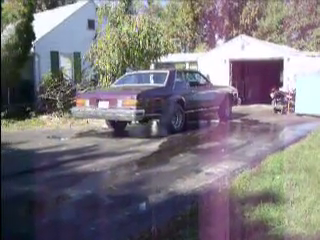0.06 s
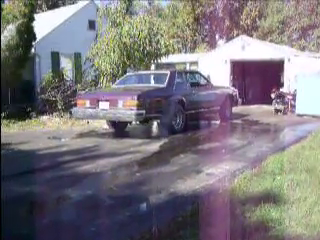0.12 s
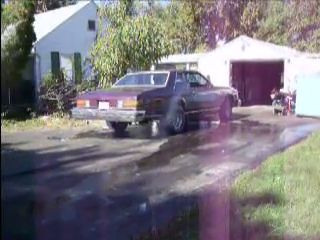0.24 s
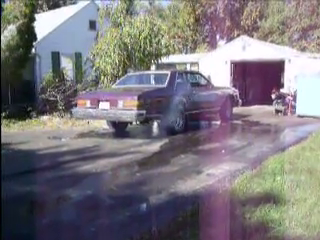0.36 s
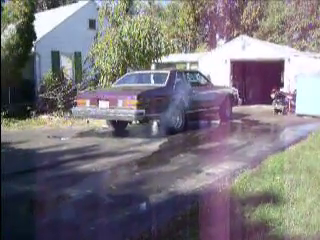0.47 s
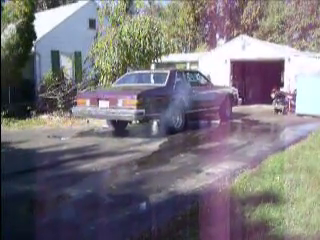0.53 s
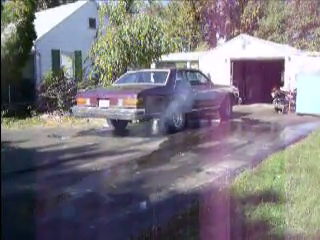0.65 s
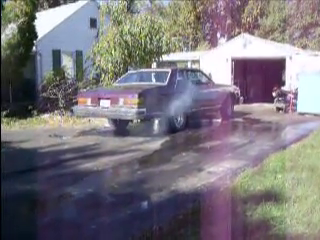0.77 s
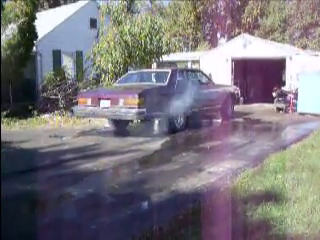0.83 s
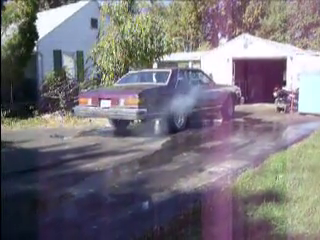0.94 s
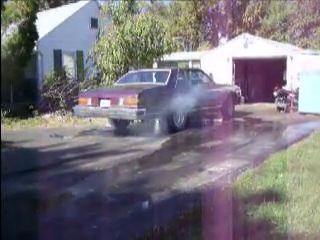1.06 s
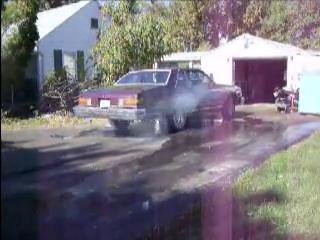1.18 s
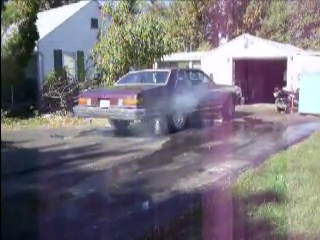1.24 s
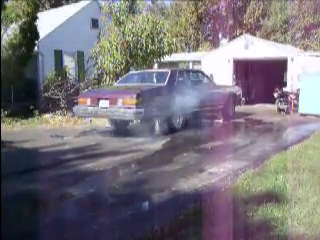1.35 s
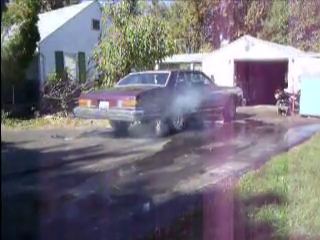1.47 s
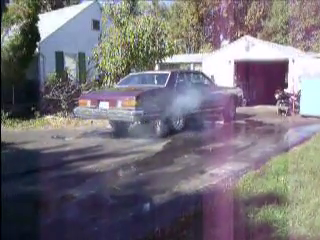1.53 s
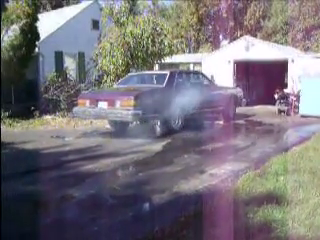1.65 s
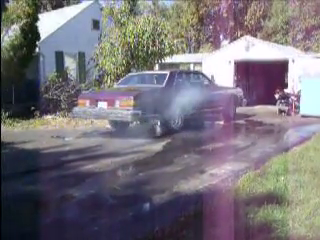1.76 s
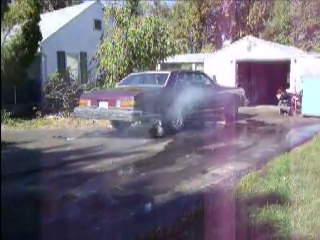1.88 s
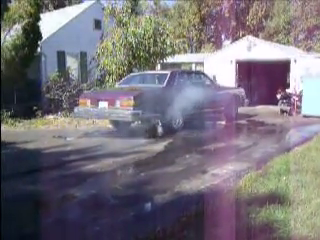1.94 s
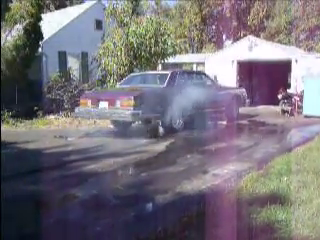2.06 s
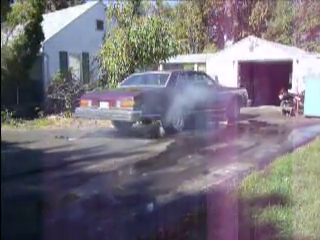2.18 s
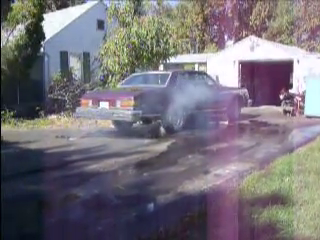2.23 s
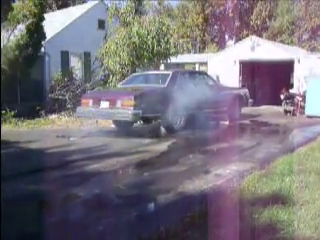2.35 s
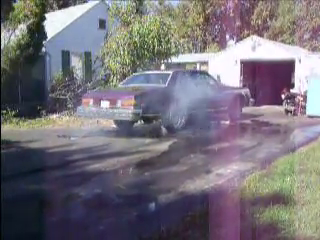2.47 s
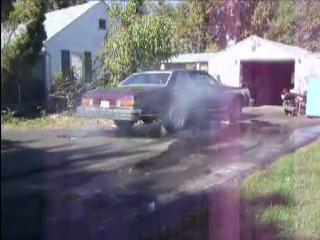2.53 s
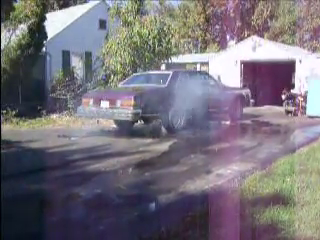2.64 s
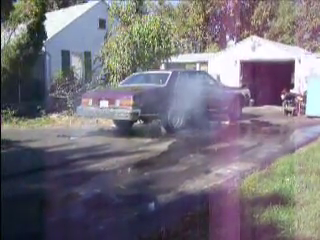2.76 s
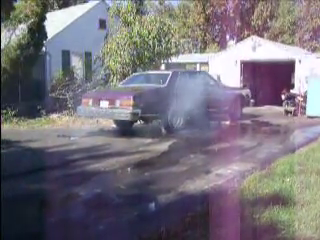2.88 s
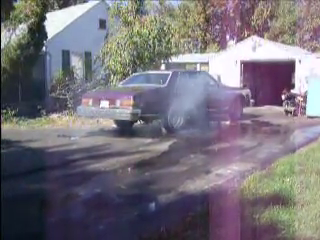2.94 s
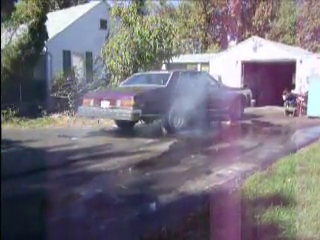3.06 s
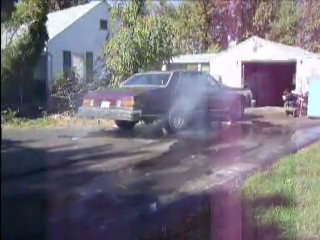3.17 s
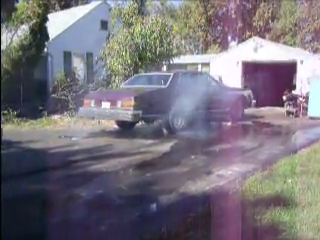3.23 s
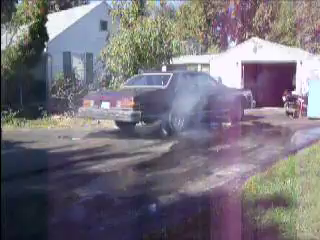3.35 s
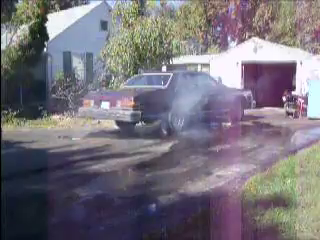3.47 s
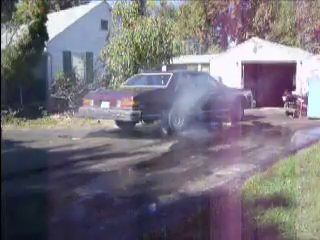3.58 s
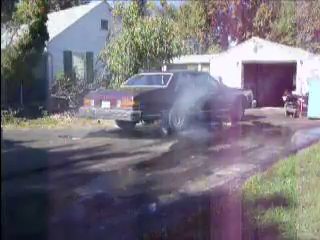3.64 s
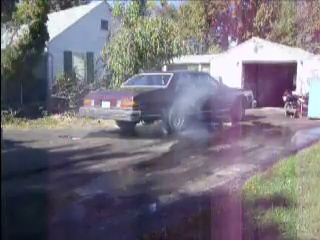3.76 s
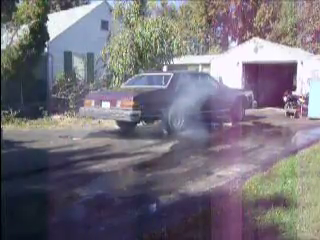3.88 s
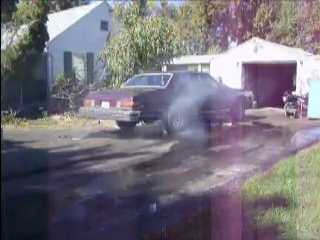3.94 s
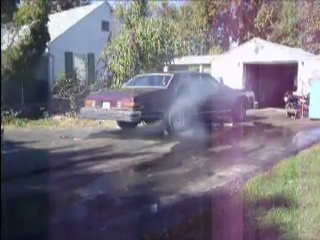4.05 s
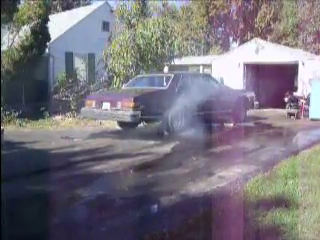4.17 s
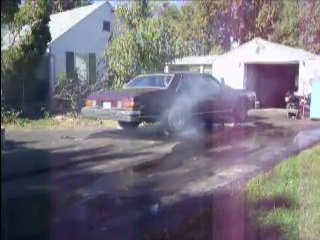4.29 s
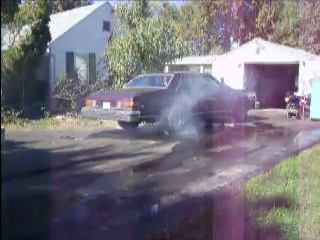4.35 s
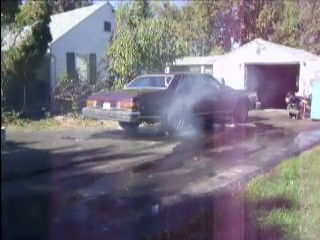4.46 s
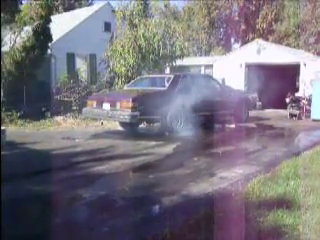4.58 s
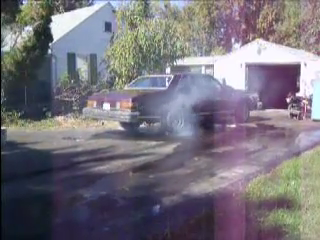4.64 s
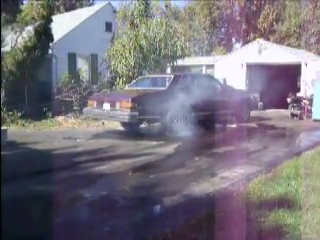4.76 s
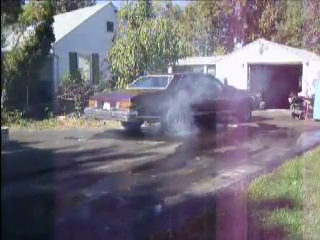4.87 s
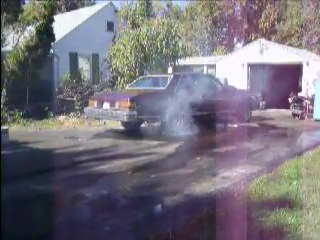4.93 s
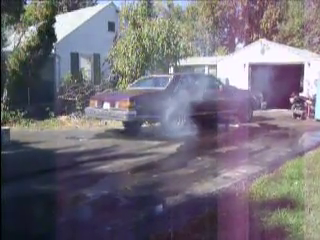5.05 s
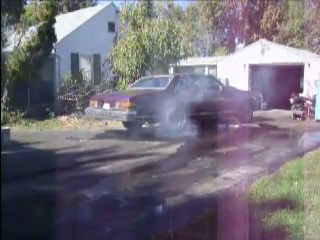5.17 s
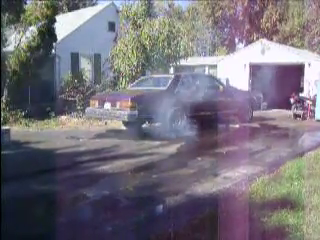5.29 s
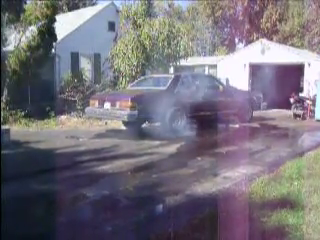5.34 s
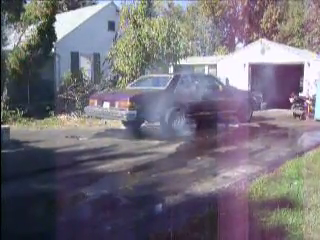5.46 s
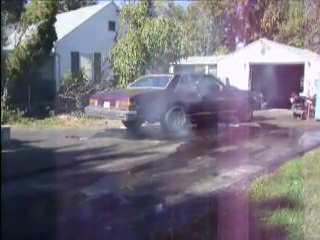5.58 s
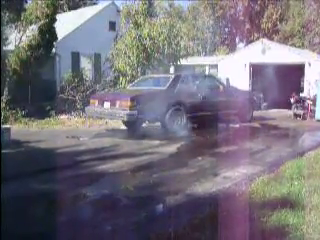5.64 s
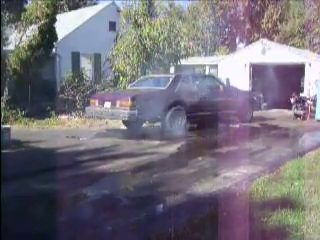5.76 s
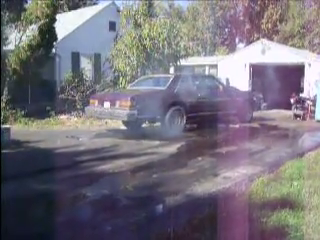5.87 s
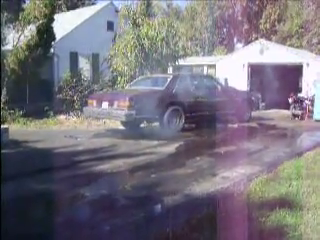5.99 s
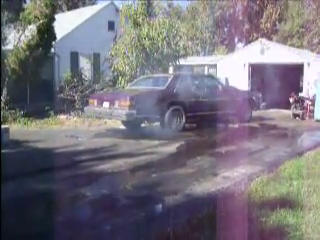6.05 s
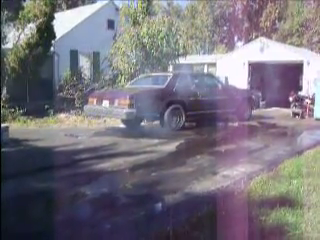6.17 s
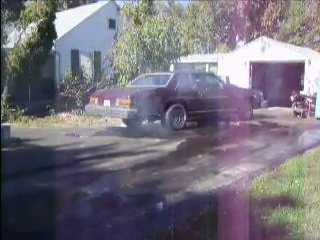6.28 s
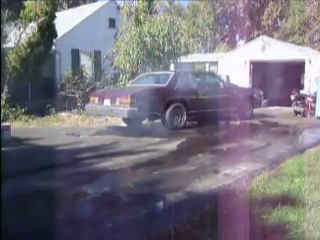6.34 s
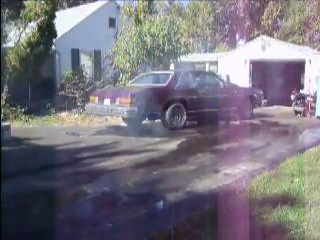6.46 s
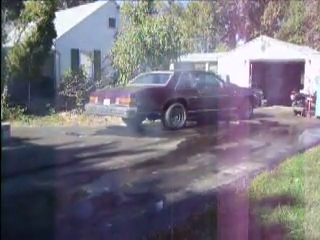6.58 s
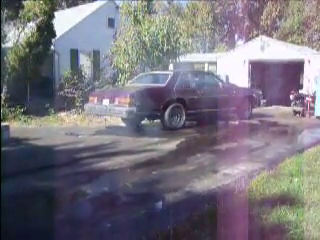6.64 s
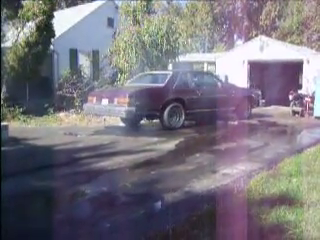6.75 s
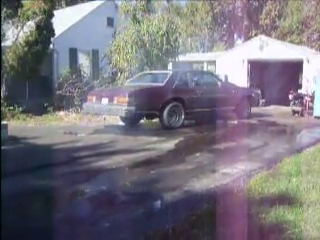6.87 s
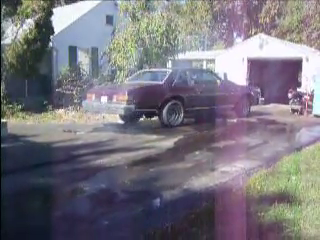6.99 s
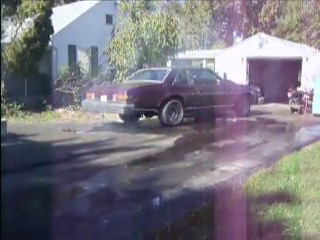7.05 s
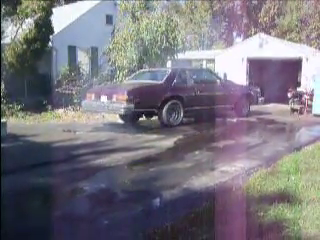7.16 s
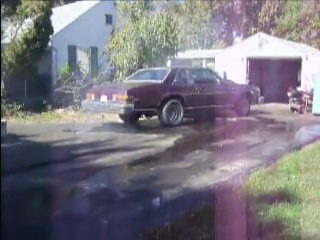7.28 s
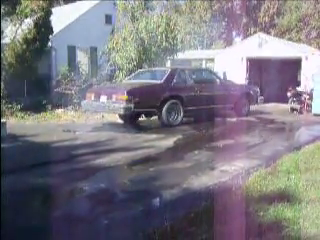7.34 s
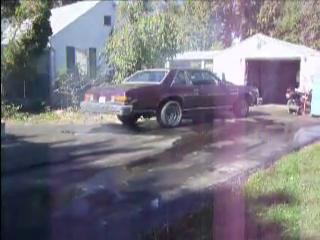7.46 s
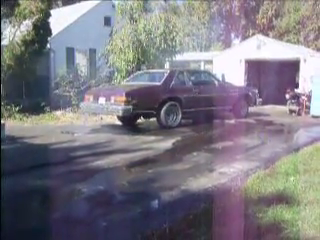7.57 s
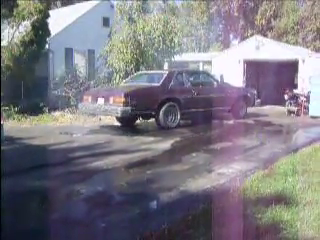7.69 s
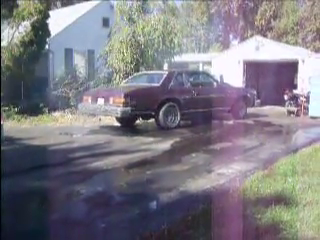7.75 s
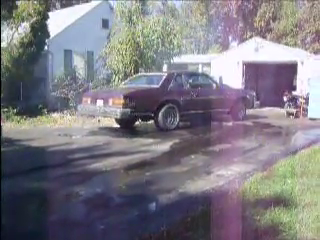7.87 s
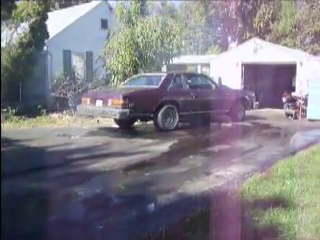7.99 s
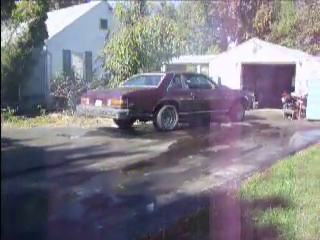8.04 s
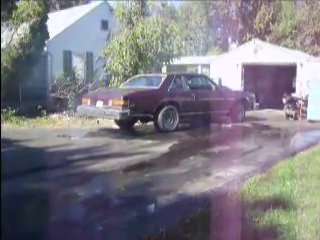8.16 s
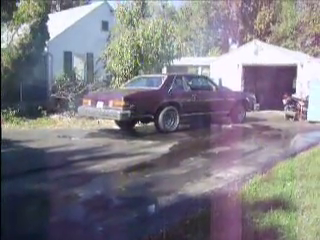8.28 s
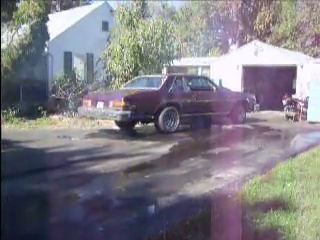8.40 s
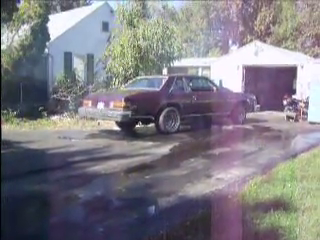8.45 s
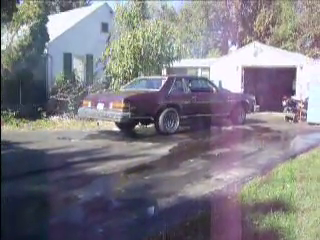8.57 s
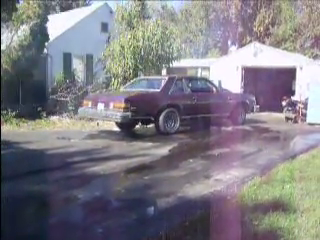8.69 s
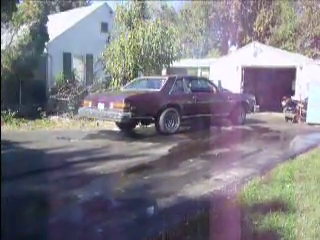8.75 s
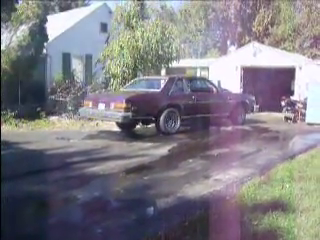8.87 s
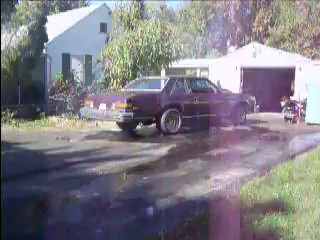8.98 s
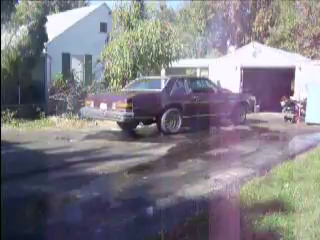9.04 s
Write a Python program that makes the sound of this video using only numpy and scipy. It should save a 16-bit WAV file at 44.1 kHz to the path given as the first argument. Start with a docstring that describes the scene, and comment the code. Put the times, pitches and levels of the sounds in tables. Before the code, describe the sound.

A big car engine is already racing at high revs, close by on a wet driveway, with the hiss of a spinning tyre. From about 0.7 to 1.6 seconds its pitch is dragged down by roughly an octave, and it then labours in a steady roar with faint exhaust ticking. The tyre chirps sharply between 1.4 and 1.8 seconds and squeals raggedly on, fading around 3.5 seconds and returning in brief chirps until nearly 5. At about 5 seconds the throttle closes, the tyre noise dies and the revs tumble to a deep, lumpy idle. From 5.3 seconds a leaking exhaust spits and pops in quick, uneven runs over the low throb. The revs lift slightly at 6.4 seconds and again from 8.5 until the end, around 9. Nearby walls give a short echo, and the loudest beats slightly overload the microphone.

```python
"""A wet driveway between house and garage, one microphone close to a V8 car spinning a rear tyre.
The engine races, is dragged down as the tyre bites and squeals, labours for three seconds, then drops
to a lumpy idle. Cylinder pulses boom in the pipe and bark at its mouth; one bank spits through a leak
in the exhaust. The walls answer, and the loudest exhaust beats overload the microphone."""
import sys
import numpy as np
from scipy import signal
from scipy.fft import rfft, irfft
from scipy.io import wavfile
from scipy.ndimage import uniform_filter1d, map_coordinates

SR = 44100
rng = np.random.default_rng(int(sys.argv[2]) if len(sys.argv) > 2 else 0)


def master_out(mix):
    """Clip the mix to full scale and print it as 16-bit PCM to the path in sys.argv[1]."""
    frames = np.transpose(np.atleast_2d(mix))
    ceiling = np.clip(frames, -1, 1)
    pcm = np.round(ceiling * 32767).astype(np.int16)
    wavfile.write(sys.argv[1], SR, pcm)


N = 402191
TIME = np.arange(N) / SR
LIFT_S, SHUT_S = 4.734, 4.98  # the foot starts to lift; the throttle is half shut

# Engine speed. Each row: time in seconds, firings per second.
FIRING_RATE = [(0, 273.8), (.45, 270), (.72, 263.5), (.9, 239), (1.1, 198.8), (1.4, 154.5), (1.6, 139.8),
               (2.3, 139.1), (2.8, 140.8), (4.2, 138.3), (4.75, 133.5), (4.9, 124), (5.1, 72), (5.35, 43),
               (6.05, 41), (6.4, 55), (7.3, 54), (8.25, 46), (8.5, 55), (8.56, 79), (9.12, 84)]
# The eight cylinders in firing order. Each row: pulse in dB, lag down the pipe in ms, leak in dB.
CYLINDERS = [(-1.1, 0, 2), (5.5, 4, -1), (-0.5, 3, -18.5), (0.5, 2, -7), (1.6, 1.5, 1), (5.5, 1.22, -29.5),
             (7, 2.5, -22), (-4, 3, 6)]
# Runs of spits at idle. Each row: start in seconds, number of spits, first jet in dB, first pop in dB.
SPIT_RUNS = [(5.345, 2, -28.5, -39.5), (5.505, 2, -17.5, -32), (5.609, 1, -18.5, -33.5),
             (5.654, 2, -17, -34.5), (5.746, 1, -14.5, -29.5), (5.793, 1, -13.5, -24.5),
             (5.838, 2, -12.5, -31), (5.927, 1, -12.5, -38), (6.03, 2, -20, -34.5), (6.13, 2, -9, -24),
             (6.258, 1, -11.5, -24.5), (6.338, 2, -14.5, -30.5), (6.446, 4, -10, -26.5),
             (6.589, 1, -10.5, -34), (6.664, 2, -17.5, -36.5), (6.735, 2, -10.5, -29), (6.843, 1, -15, -27),
             (6.918, 2, -20, -35), (7.028, 4, -12, -27.5), (7.175, 1, -12, -34.5), (7.252, 1, -16, -33.5),
             (7.32, 2, -11.5, -24), (7.431, 1, -14, -27), (7.506, 2, -16.5, -33), (7.625, 4, -13.5, -27),
             (7.786, 1, -14.5, -44), (7.876, 1, -18.5, -35.5), (7.966, 2, -10.5, -25), (8.089, 3, -14, -30),
             (8.211, 2, -24, -40), (8.299, 4, -10.5, -27.5), (8.458, 3, -14.5, -31),
             (8.557, 1, -14.5, -28.5), (8.584, 4, -11.5, -27), (8.708, 1, -16, -31), (8.779, 2, -13.5, -30),
             (8.847, 2, -18, -31.5), (8.966, 2, -12.5, -30.5), (9.015, 3, -10.5, -28),
             (9.088, 1, -9, -24.5)]
# Spectra of rushing gas. Each row: frequency in Hz, gain in dB.
PIPE_RASP = [(140, -21.5), (230, -8.5), (315, -3), (440, -9.5), (560, -8), (650, -10.5), (740, 2),
             (830, -3.5), (900, -6), (1010, -5.5), (1230, -20), (1550, -8.5), (1820, -22), (2130, -12),
             (2600, -16.5), (3400, -22.5), (5700, -103)]
LEAK_JET = [(1060, -58), (1800, -15), (2130, -1), (2610, -11.5), (2780, -2.5), (3570, 0.5), (3880, -3.5),
            (4780, 0.5), (5660, 3.5), (6600, -5.5), (8900, 2.5), (11000, -3.5), (11700, -15), (12400, -60),
            (16100, -81), (22000, -120)]
LEAK_SIZZLE = [(3000, -29.5), (5400, -7.5), (6700, -8.5), (8600, -5), (10000, -12), (12300, -44)]


def exhaust(turn, times, cylinder, jitter_ms=0.082, boom_fall_db_per_s=20.5, mouth_fall_db_per_s=66):
    """Uneven cylinder pulses boom in the pipe and bark at its mouth, each with a puff of turbulence."""
    # Rumble inside the pipe and bark at its mouth. Each row: frequency in Hz, gain in dB.
    rumble_spectrum = [(30, -21), (90, 2), (200, -0.5), (290, -3), (380, -1.5), (480, -16), (620, -36)]
    bark_spectrum = [(400, -47), (520, -28), (620, 1), (760, -3), (900, -2.5), (1000, -3.5), (1200, -31),
                     (1550, -30), (1850, -31), (2100, -32), (2700, -26), (5000, -57)]
    size_db, lag_ms, _ = np.array(CYLINDERS)[cylinder].T
    timing, strength, gust = rng.standard_normal((len(times), 3)).T
    arrivals = times + (lag_ms + jitter_ms * timing) / 1000
    beats = pulses(arrivals, amp(size_db + 2.5 * strength))
    flow = steady(puffs(times, amp(3.5 * gust), rise_s=.002))
    racing = np.clip((curves(FIRING_RATE)[0] - 148) / 118, 0, 1)
    strain = np.sin(np.pi * racing)  # combustion is roughest while the engine is dragged down
    boom = pipe_tones(turn, racing, strain) + turbulence(flow * amp(-20 + 12 * strain), rumble_spectrum)
    bark = amp(-4 - 12 * racing) * steady(colour(beats, bark_spectrum))
    rasp = turbulence(flow * amp(-5 - 4 * racing), PIPE_RASP)
    lifted_s = np.maximum(TIME - LIFT_S, 0)
    boom_db = -14 - boom_fall_db_per_s * lifted_s
    mouth_db = -26 + 8.5 * racing + 1.5 * strain - mouth_fall_db_per_s * lifted_s
    return (1 - throttle_shut()) * amp(boom_db) * boom + amp(mouth_db) * (bark + rasp)


def pipe_tones(turn, racing, strain, waver_db=.9, burble_db=7):
    """Harmonics of the engine cycle; the pattern of strong and weak cylinders lines them up into beats."""
    # Each row: multiple of the eight-cylinder cycle, level racing free in dB, level labouring in dB.
    harmonics = [(3, -22, -28), (4, -21, -32), (5, -4, -10), (6, -13, -13), (7, -19, -8), (8, -2, 0),
                 (9, -9, -9), (10, -25, -17), (11, -14, -8), (12, -12, -19), (13, -15, -16), (14, -31, -15),
                 (15, -33, -24), (16, -21, -28), (17, -27, -26), (18, -14, -32), (19, -16, -25),
                 (20, -12, -31), (21, -11, -26), (22, -14, -28), (23, -19, -31), (24, -23, -26),
                 (26, -14, -40), (28, -19, -36), (36, -38, -22), (39, -38, -28), (43, -36, -25),
                 (46, -36, -26)]
    # The muffler swallows tones that slide through its dead band. Each row: frequency in Hz, gain in dB.
    muffler = [(440, 0), (475, -14), (520, -14), (545, -3), (600, 0)]
    pattern = np.angle(np.fft.fft(amp(np.transpose(CYLINDERS)[0])))
    cycle = 2 * np.pi * turn / len(CYLINDERS)
    tones = np.zeros(N)
    for multiple, racing_db, labouring_db in harmonics:
        k = round(multiple)
        level = racing * racing_db + (1 - racing) * labouring_db + waver_db * wobble(13)
        # under strain the two banks beat against each other, lifting multiples 5, 13 and 21
        level += burble_db * strain * (k % len(CYLINDERS) == 5)
        dispersion = np.pi / 3 * (k - len(CYLINDERS)) ** 2  # the long pipe smears the beats
        drift = (.08 + .009 * k) * wobble(18)
        tones += amp(level) * np.cos(k * cycle + pattern[k % len(pattern)] + dispersion + drift)
    return steady(colour(tones, muffler))


def idle(times, cylinder, scatter_db=7.5, jitter_s=0.00081, bank_db=3, blip_ratio=1.194):
    """Slow, ragged firings ring the pipe's lowest resonance, which wanders and rises with the revs."""
    # The idle's lope. Each row: time in seconds, level in dB.
    lope = [(5, -21.5), (5.17, -28.5), (5.5, -29.5), (5.67, -22), (5.93, -26), (6.2, -22.5), (7.5, -23.5),
            (7.8, -19), (7.89, -30), (8, -20.5), (8.28, -23), (8.4, -20.5), (9.12, -20)]
    # The pipe's boom. Each row: frequency in Hz, gain in dB.
    resonance = [(15, -37), (30, -6), (55, -12.5), (76, -3), (97, 6.5), (115, -1.5), (145, -15.5),
                 (200, -21), (300, -31.5), (450, -61), (3000, -110)]
    strength, timing = rng.standard_normal((len(times), 2)).T
    size_db = 0.19 * np.array(CYLINDERS)[cylinder, 0] - bank_db * (cylinder % 2) + scatter_db * strength
    beats = pulses(times + jitter_s * timing, amp(size_db))
    blip = np.clip((curves(FIRING_RATE)[0] - 55) / 28 + 0.35 * wobble(7), 0, 1)  # a touch of throttle
    low = colour(beats, resonance)
    high = colour(beats, np.array(resonance) * [blip_ratio, 1])
    boom = steady((1 - blip) * low + blip * high, size=2400)
    return throttle_shut() * amp(curves(lope)[0]) * boom


def firings():
    """Running count of firings; at idle the crank stumbles so each run of spits starts on an even one."""
    turn = np.cumsum(curves(FIRING_RATE)[0]) / SR
    run_s = np.transpose(SPIT_RUNS)[0]
    stumble = np.unwrap(np.interp(run_s, TIME, turn) % 2, period=2)
    return turn - np.interp(TIME, np.r_[run_s[0] - .5, run_s], np.r_[0, stumble])


def throttle_shut(closing_s=0.1):
    """0 while the throttle is open, 1 once it has closed."""
    return np.clip((TIME - SHUT_S) / closing_s + .5, 0, 1)


def leak_ticks(times, cylinder, scatter_db=3.5, sizzle_share=0.33):
    """Under load, gas escaping through the leak ticks with a few of the cylinders."""
    # Each row: time in seconds, level of the ticking in dB.
    loudness = [(0, -37.5), (1.8, -38), (2.2, -32), (2.9, -31.5), (3.3, -40.5), (4.2, -31), (4.8, -28.5),
                (4.92, -35), (5.02, -70)]
    sizes = amp(np.array(CYLINDERS)[cylinder, 2] + scatter_db * rng.uniform(-0.63, 1, len(times)))
    gas = (1 - sizzle_share) * noise(LEAK_JET) + sizzle_share * noise(LEAK_SIZZLE)
    return amp(curves(loudness)[0]) * steady(puffs(times, sizes, rise_s=0.0017) * gas, size=12000)


def leak_spits(turn, lead_s=0.0052, sizzle_growth=1.63):
    """At idle the leak spits jets of gas that pop in the pipe; the hardest ones sizzle at their peak."""
    # The dry crack that some spits carry. Each row: frequency in Hz, gain in dB.
    crack_spectrum = [(1200, -42), (2300, -12), (3000, -6), (4400, 1), (6000, -2.5), (9000, -25)]
    times, jet_db, pop_db = spit_beats(turn)
    onsets = times - lead_s
    jet_flow = puffs(onsets, amp(jet_db - 13), rise_s=0.0077) * amp(1.6 * wobble(500))
    jet = turbulence(jet_flow, LEAK_JET)
    sizzle = turbulence(puffs(times, amp(sizzle_growth * jet_db - 2), rise_s=0.0029), LEAK_SIZZLE)
    ring = pipe_ring(times, pop_db - 1)
    crack_sizes = amp(jet_db - 15) * rng.uniform(0, 1, len(times)) ** 2
    crack = turbulence(puffs(onsets, crack_sizes, rise_s=0.014), crack_spectrum)
    clinks = steel_clinks(times, jet_db - 12)
    pop = turbulence(puffs(onsets, amp(pop_db - 0.5), rise_s=0.01), PIPE_RASP)
    return jet + crack + sizzle + clinks + ring + pop


def spit_beats(turn, fade_db=0.9, offbeat_db=2.5):
    """Time, jet dB and pop dB of each spit: a fading run follows the leaking bank, strong then weak."""
    beats = []
    for start, count, jet_db, pop_db in SPIT_RUNS:
        for k in range(round(count)):
            loss = fade_db * k + offbeat_db * (k % 2)
            beats.append((np.interp(start, TIME, turn) + 2 * k, jet_db - loss, pop_db - loss))
    firing, jet, pop = np.transpose(beats)
    return np.interp(firing, turn, TIME), jet, pop


def pipe_ring(times, db, centre_hz=810, spread=0.1726, t60=0.11, attack_s=0.013):
    """Each pop leaves three hollow tones ringing, never quite the same ones."""
    detune = np.clip(rng.standard_normal((len(times), 3, 1)), -2, 1.5)
    return ringing(times, db, centre_hz * np.exp(spread * detune), t60, attack_s, size=SR // 5)


def steel_clinks(times, db, low_hz=2000, high_hz=6000, t60=0.043, attack_s=0.0056):
    """Each spit rings the thin steel around the leak at three pitches of its own."""
    pitches = low_hz * (high_hz / low_hz) ** rng.uniform(0, 1, (len(times), 3, 1))
    return ringing(times, db, pitches, t60, attack_s, size=SR // 10)


def tyre_hiss():
    """The spinning tyre hisses on wet asphalt."""
    # Each row: time in seconds, level of the hiss in dB.
    loudness = [(0, -31.5), (.8, -29.5), (1.1, -35.5), (1.5, -30), (4.8, -32), (4.95, -46), (5.25, -73)]
    # Each row: frequency in Hz, gain in dB.
    spectrum = [(680, -27), (1150, -14), (1280, -7.5), (1570, -2), (1820, -10), (2130, 3.5), (2570, -13.5),
                (2870, -5), (4320, -4), (4670, -2.5), (6490, -7), (9380, -4.5), (11000, -9.5), (11700, -29),
                (12400, -59), (22000, -120)]
    return amp(curves(loudness)[0] + 1.2 * wobble(40)) * noise(spectrum)


def tyre_squeal(wander=0.03, roughness=0.031, flutter_db=4, patchy_db=3, ribs=2):
    """Once the tyre has rubbed its patch dry, its tread ribs squeal raggedly."""
    # The rubber's harmonics. Each row: multiple of the pitch, relative level in dB.
    harmonics = [(1, -7.5), (2, 0), (3, -8.5)]
    pitch, level = squeal_path()
    fundamental_db = 9 * np.clip((1700 - pitch) / 130, 0, 1)  # low chirps favour their fundamental
    squeal = np.zeros(N)
    for _ in range(ribs):
        ragged_hz = pitch * (1 + wander * wobble(45) + roughness * wobble(900))
        phase = 2 * np.pi * np.cumsum(ragged_hz) / SR
        rib = sum(amp(db + fundamental_db * (k == 1) + flutter_db * wobble(250)) * np.sin(k * phase)
                  for k, db in harmonics)
        squeal += amp(patchy_db * wobble(30.11)) * rib
    return amp(level - 2) * unit(squeal)


def squeal_path(half_chirp_s=.036):
    """Pitch and dB of the squeal: the tread grabs, swoops into a chirp and lets go."""
    # The held squeal and its chirps. Each row: time in seconds, pitch in Hz, relative level in dB.
    sustained = [(1.39, 2123, -64), (1.43, 2125, -30.5), (2.45, 1929, -30), (2.88, 1943, -32.5),
                 (3.35, 1720, -38), (3.7, 1563, -57), (4.45, 1823, -43), (4.58, 1952, -35),
                 (4.92, 1854, -33.5), (5.12, 1800, -90)]
    chirps = [(1.435, 2116, -21.5), (1.515, 1872, -20.5), (1.65, 1954, -27.5), (1.725, 1994, -19.5),
              (1.82, 2156, -30), (2.399, 1916, -24), (2.59, 1807, -29), (3.78, 1563, -30),
              (4.69, 1567, -32), (4.76, 2083, -35)]
    pitch, level = curves(sustained)
    for peak_s, hz, db in chirps:
        grab = np.exp(-((TIME - peak_s) / half_chirp_s) ** 2)
        pitch = pitch + grab * (hz - pitch)
        level = level + grab * (db - level)
    return pitch, level


def walls(x, t60=0.27, build_s=0.007):
    """Scattered answer of house, garage and trees, with little bass."""
    t = TIME[:SR // 2]
    tail = rng.standard_normal(len(t)) * amp(-60 * t / t60) * (1 - np.exp(-t / build_s))
    wet = signal.fftconvolve(x, tail / np.linalg.norm(tail))[:N]
    return colour(wet, [(150, -6), (600, 4.5), (4000, 1), (10000, -4)])


def outdoor_air():
    """The steady, low background around the driveway."""
    # Each row: frequency in Hz, gain in dB.
    spectrum = [(20, -2), (150, 2), (400, -14), (900, -10.5), (1300, -19), (4000, -20.5), (10000, -26.5),
                (12500, -70)]
    return noise(spectrum)


def amp(db):
    """Decibels to gain."""
    return 10 ** (np.asarray(db) / 20)


def unit(x):
    """x at rms 1."""
    return x / np.sqrt(np.mean(x ** 2) + 1e-20)


def steady(x, size=6000):
    """x at a running rms of 1, over about size samples."""
    power = uniform_filter1d(uniform_filter1d(x ** 2, size), size // 2)
    return x / np.sqrt(np.abs(power) + 1e-14)


def curves(rows):
    """One value per sample for each column after the time."""
    seconds, *columns = np.transpose(rows)
    return [np.interp(TIME, seconds, column) for column in columns]


def wobble(rate):
    """A smooth random curve, rate knots a second."""
    knots = rng.standard_normal(int(N * rate / SR) + 4)
    fine = np.arange(0, len(knots), 1 / 8)
    return np.interp(TIME * rate, fine, map_coordinates(knots, [fine]))


def colour(x, spectrum, size=16384):
    """x through a causal filter with the (Hz, dB) spectrum as its gain."""
    hz, db = np.transpose(spectrum)
    gain = amp(np.interp(np.log(np.fft.rfftfreq(size, 1 / SR) + 1), np.log(hz), db))
    cepstrum = irfft(np.log(gain + 1e-6))
    cepstrum[1:size // 2] *= 2  # folded for minimum phase
    cepstrum[size // 2 + 1:] = 0
    response = irfft(np.exp(rfft(cepstrum)))[:size // 2]
    return signal.fftconvolve(x, response)[:N]


def noise(spectrum):
    """Coloured noise of rms 1."""
    return unit(colour(rng.standard_normal(N), spectrum))


def turbulence(flow, spectrum):
    """Noise that follows a gas flow, then rings in the spectrum; a flow of 1 gives rms 1."""
    white = rng.standard_normal(N)
    return colour(flow * white, spectrum) / np.std(colour(white, spectrum))


def pulses(times, sizes):
    """One impulse at each time."""
    return np.bincount(np.clip(np.round(times * SR), 0, N).astype(int), sizes, N + 1)[:N]


def puffs(times, sizes, rise_s):
    """Gas flow that swells after each time and dies away."""
    u = TIME[:SR // 8] / rise_s
    return signal.fftconvolve(pulses(times, sizes), (u * np.exp(1 - u)) ** 2)[:N]


def ringing(times, db, pitches, t60, attack_s, size):
    """A cluster of decaying sines, size samples long, at each time."""
    t = TIME[:size]
    fade = amp(-60 * t / t60) * (1 - np.exp(-t / attack_s))
    out = np.zeros(N + SR)
    for start, level, hz in zip(times, db, pitches):
        out[int(start * SR):][:size] += amp(level) * fade * np.sin(2 * np.pi * hz * t).sum(0)
    return out[:N]


def scene():
    """The car close by, the walls and the open air behind it, in mono."""
    turn = firings()
    number = np.arange(int(turn[-1]))
    times = np.interp(number, turn, TIME)
    cylinder = number % len(CYLINDERS)
    engine = exhaust(turn, times, cylinder) + idle(times, cylinder)
    leak = leak_ticks(times, cylinder) + leak_spits(turn)
    car = engine + leak + tyre_hiss() + tyre_squeal()
    return (car + amp(-8.5) * walls(car) + amp(-46.5) * outdoor_air())[None]


def record(dry, ceiling=0.51, hardness=7, low_hz=10, high_hz=12500):
    """The microphone flattens the highest peaks and keeps nothing outside its band."""
    flat = dry / (1 + np.abs(dry / ceiling) ** hardness) ** (1 / hardness)
    hz = np.fft.rfftfreq(N, 1 / SR)
    return irfft(rfft(flat) * (hz > low_hz) * (hz < high_hz), N)


dry = scene()
out = record(dry)
master_out(out)
```